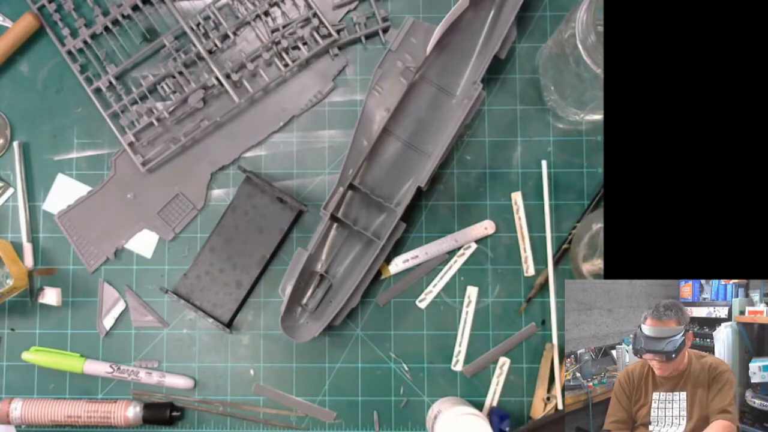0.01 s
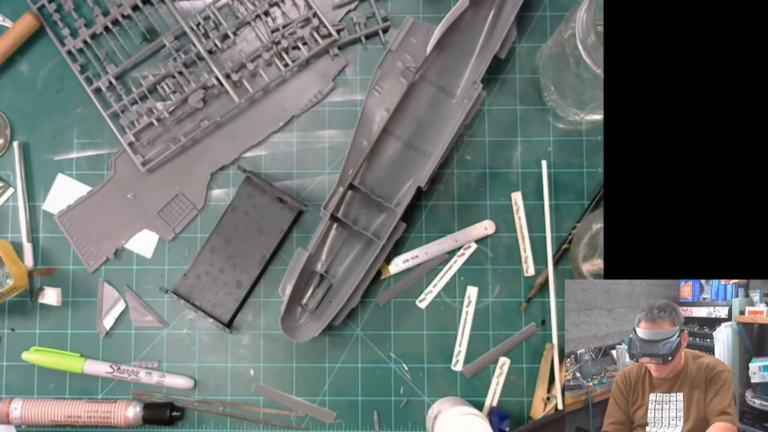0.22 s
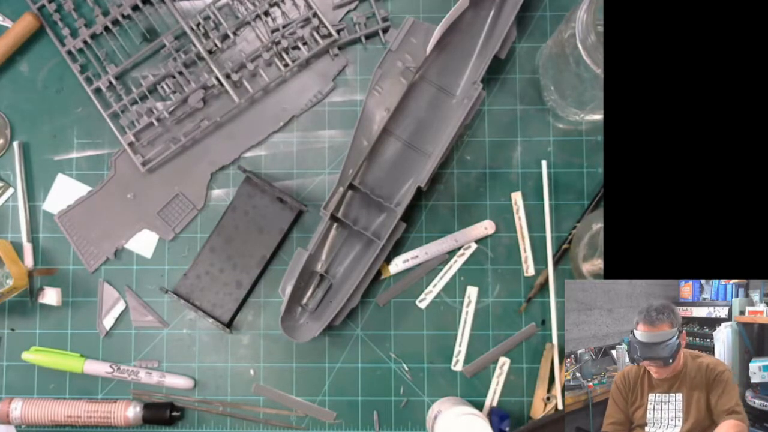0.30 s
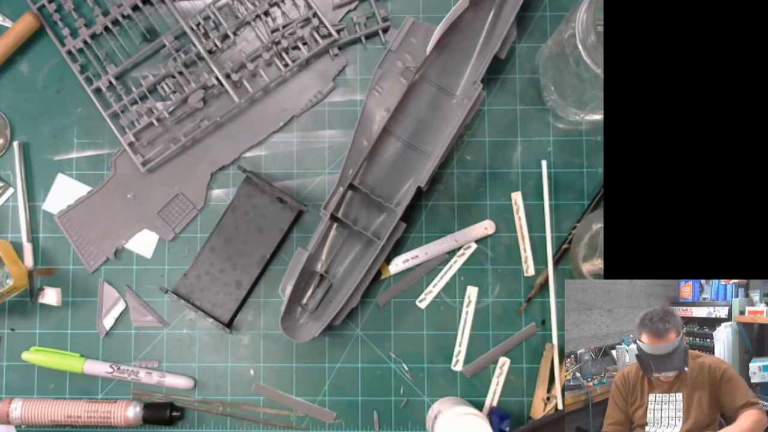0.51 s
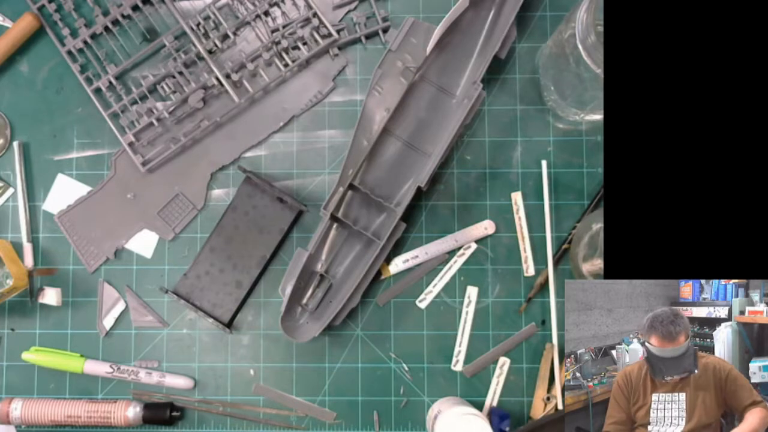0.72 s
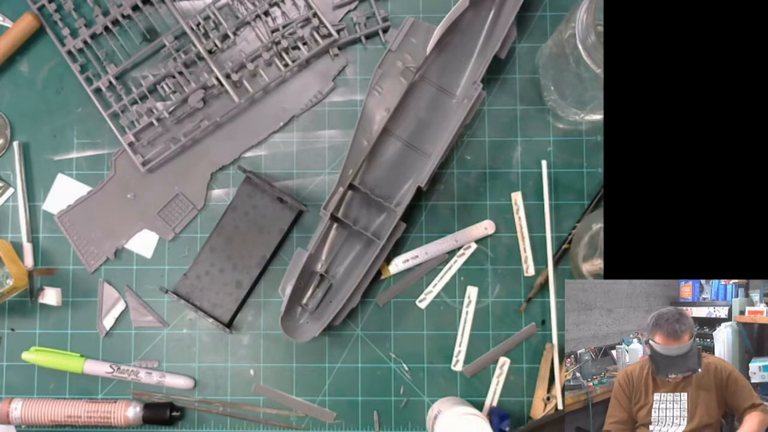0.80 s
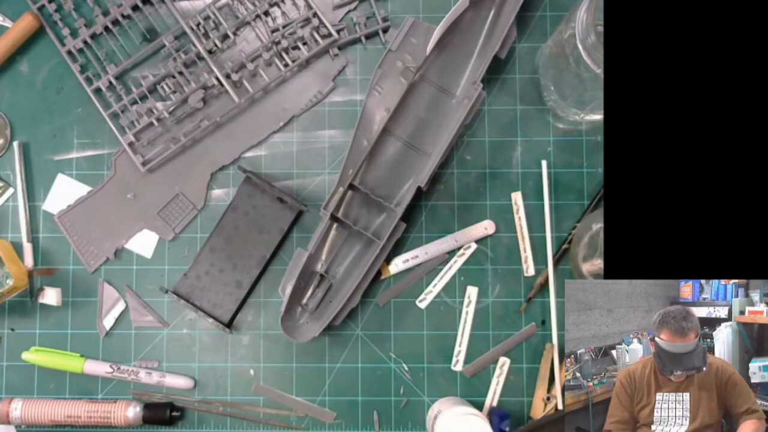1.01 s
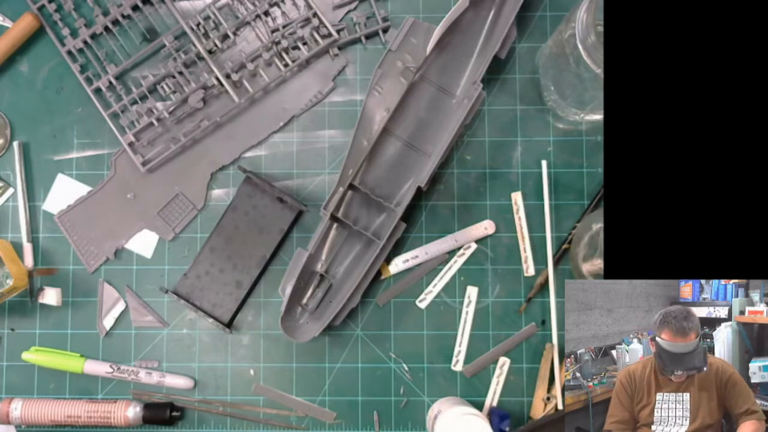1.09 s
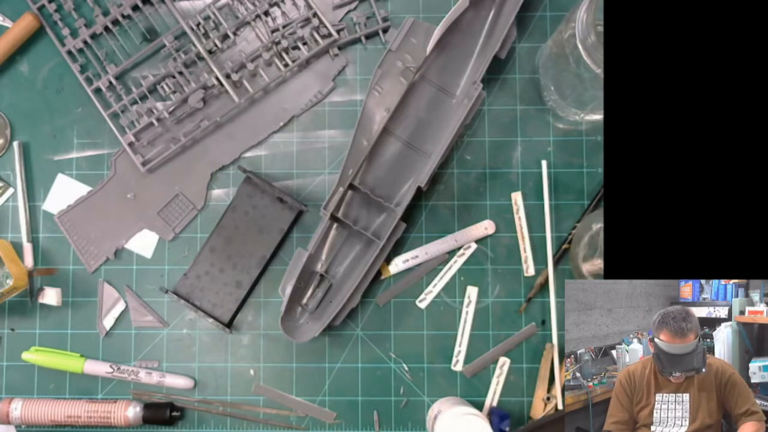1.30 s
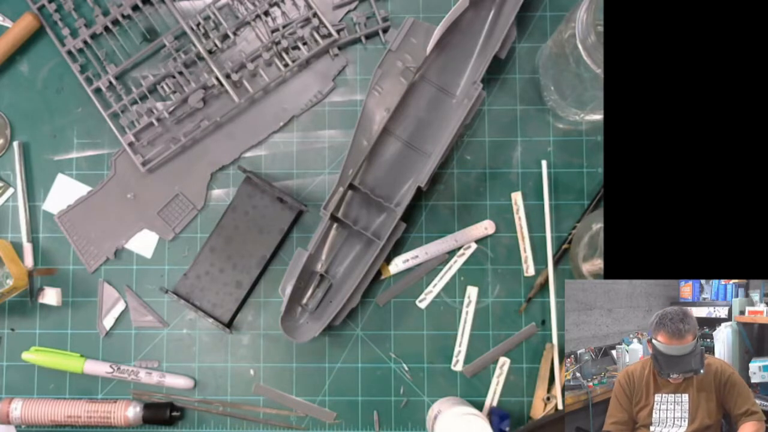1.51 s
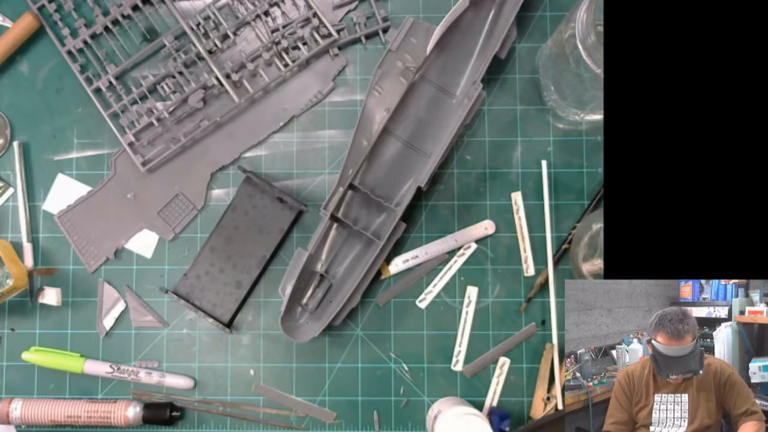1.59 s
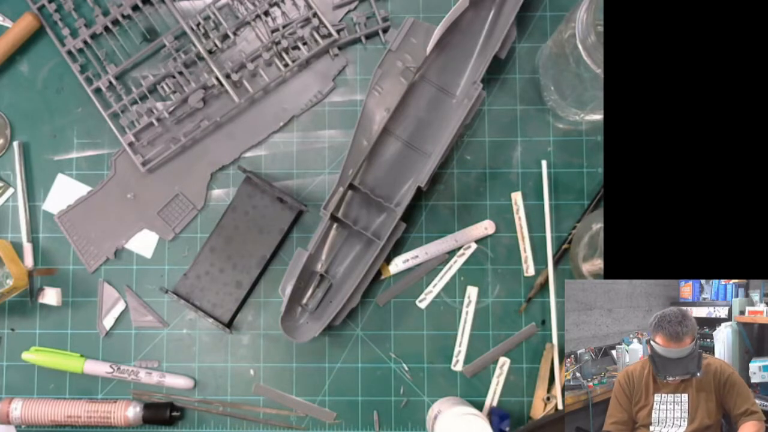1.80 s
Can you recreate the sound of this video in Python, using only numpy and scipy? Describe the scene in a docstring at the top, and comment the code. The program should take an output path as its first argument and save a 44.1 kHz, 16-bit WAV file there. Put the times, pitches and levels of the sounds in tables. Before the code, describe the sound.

One sharp, irregular plastic snip with a brief metallic ring and a rattling bounce comes early; later the tool's joint ticks very quietly. A soft, slightly uneven fan drones throughout, recorded close at a hobby desk.

```python
"""A burst of cracks: steel cutters bite through a plastic sprue, the jaws ring and the part bounces.
Later the cutters' joint ticks faintly as they are handled, close to the microphone at a hobby desk.
Decaying modes make sprue, jaws, joint and spring; noise makes crack, scrape and rustle.
Behind it a fan, slightly unsteady tones over an uneven rush of air, hums in the small room."""
import sys
import numpy as np
from scipy import signal
from scipy.fft import rfft, irfft, next_fast_len
from scipy.io import wavfile
from scipy.ndimage import map_coordinates

SR = 44100
rng = np.random.default_rng(int(sys.argv[2]) if len(sys.argv) > 2 else 0)


def transcribe(u):
    """Save the signal u as a 16-bit wav file named by the first command-line argument.

    u: samples, shape (n,) or (channels, n), limited to [-1, 1]; the rate is SR.
    q: integer samples, one column per channel.
    """
    v = np.clip(np.atleast_2d(u).T, -1, 1)
    q = np.round(v * 32767).astype(np.int16)
    wavfile.write(sys.argv[1], SR, q)


def linear_from_db(decibels):
    """Turn decibels (scalar or array-like) into linear amplitude factors; 0 gives 1."""
    return 10 ** (np.asarray(decibels, float) / 20)


N = 79380  # length in samples, 1.8 s


def along(points, hz):
    """Read (Hz, value) points at hz, interpolating on a log frequency axis."""
    f, v = np.transpose(points)
    return np.interp(np.log(hz + 1), np.log(f + 1), v)


def wobble(rate):
    """A smooth random curve with rate knots a second."""
    knots = rng.standard_normal(N // 8)
    return map_coordinates(knots, [np.arange(N) * rate / SR])


def filtered(x, response):
    """Multiply the spectrum of x by a response of frequency."""
    m = next_fast_len(len(x) + 8192)
    hz = np.fft.rfftfreq(m, 1 / SR)
    return irfft(rfft(x, m) * response(hz), m)[:len(x)]


def ring(modes):
    """Answer of a struck body: decaying sines, alternate modes in opposite sign."""
    t = np.arange(SR // 4) / SR
    total = np.zeros(len(t))
    for k, (hz, db, t60) in enumerate(modes):
        decay = linear_from_db(db - 60 * t / t60)
        total += (-1) ** k * decay * np.sin(2 * np.pi * hz * t)
    return total


def add(track, s, x):
    """Mix x into the track at time s."""
    i = round(s * SR)
    track[i:i + len(x)] += x[:len(track) - i]


def snip():
    """Every contact knocks the sprue, spits a crack and rings the jaws, which choke their ring on shutting."""
    # contacts in the snip: t/s, then sprue knock, crack, lower and upper jaw ring, each level/dB
    contacts = [(0.2033, -18, -47, -54.5, -55.5), (0.205, -9.5, -15.5, -25, -41.5),
                (.2083, -28, -26, -39, -32.5), (0.2107, -13, -14, -24.5, -19),
                (0.2127, -18.5, -17, -27.5, -27), (.2170, -31, -21, -26, -30),
                (0.2215, -22, -34, -42.5, -43.5), (0.2425, -22, -37.5, -39, -48),
                (.2520, -27.5, -39.5, -37, -49.5), (.2637, -14, -25, -32.5, -49),
                (.2670, -31.5, -27.5, -33.5, -42.5), (.2712, -30, -33, -41, -41),
                (.2800, -34, -37, -51, -51), (.2910, -28.5, -45.5, -60, -56), (.2990, -42, -48.5, -51, -55)]
    # modes of the plastic sprue frame: f/Hz, level/dB, t60/s
    plastic = [(1367, -22, 0.032), (1779, -16.5, 0.026), (1930, -18, .022), (2225, -14, 0.024),
               (2345, -15, 0.035), (2485, -16, 0.019), (3250, -20, .012), (3794, -17, .018),
               (4350, -17.5, 0.021), (4695, -13.5, 0.0248), (5200, -14, 0.0082), (5528, -17.5, 0.011)]
    # modes of the steel jaws: f/Hz
    jaw_hz = [6146, 6700, 6910, 7712, 7835, 7903, 8600, 10010, 11038, 11190, 11650, 12665, 13548, 14120]
    # the same jaw modes in the same order: level/dB, t60/s
    jaw_modes = [(-1.5, 0.073), (-16, .04), (-14.5, 0.036), (-11, .2), (-7.5, 0.061), (-3.5, .08),
                 (-15.5, 0.018), (-18.5, .03), (-6, .05), (-9.5, .04), (-13.5, 0.027), (-2, 0.058),
                 (-2.5, 0.069), (-15, .03)]
    # colour of the crack: f/Hz, gain/dB
    crack_colour = [(900, -42.5), (1400, -10.5), (2800, -4.5), (4500, 1.5), (6000, -1.5), (8300, 3),
                    (10000, -9.5), (13000, -4), (15500, -7.5)]
    upper_hz = 9500  # splits the lower jaw ring from the upper
    crack_t60_s = 0.01
    shut_s, shut_db = 0.235, -10  # the jaws meet and choke their ring
    chatter = 0.25  # depth to which the loose blades roughen the ring
    low_cut_hz = 1400  # the small parts radiate little lower

    jaws = [(hz, *mode) for hz, mode in zip(jaw_hz, jaw_modes)]
    lower = ring([mode for mode in jaws if mode[0] < upper_hz])
    upper = ring([mode for mode in jaws if mode[0] >= upper_hz])
    sprue = ring(plastic)
    knock, spit = np.zeros(N), np.zeros(N)
    open_steel, shut_steel = np.zeros(N), np.zeros(N)
    t = np.arange(SR // 50) / SR
    for s, knock_db, crack_db, lower_db, upper_db in contacts:
        add(knock, s, linear_from_db(knock_db) * sprue)
        steel = shut_steel if s > shut_s else open_steel
        add(steel, s, linear_from_db(lower_db) * lower + linear_from_db(upper_db) * upper)
        add(spit, s, linear_from_db(crack_db - 60 * t / crack_t60_s) * rng.standard_normal(len(t)))

    choke_db = np.interp(np.arange(N) / SR, [shut_s - .002, shut_s + .001], [0, shut_db])
    # only contacts before the jaws shut are choked
    steel = linear_from_db(choke_db) * open_steel + shut_steel
    steel *= 1 + chatter * wobble(1500)
    crack = filtered(spit, lambda hz: linear_from_db(along(crack_colour, hz)))
    high_pass = signal.butter(6, low_cut_hz, "high", fs=SR, output="sos")
    return signal.sosfilt(high_pass, knock + steel + crack)


def ticks():
    """A short dying scrape excites the joint and the return spring; the hand rustles on the grip."""
    # ticks of the joint: t/s, then joint, spring and rustle, each level/dB, and scrape t60/s
    tick_list = [(1.328, -79, -57.5, -39.5, .2), (1.356, -72, -44, -49, 0.011),
                 (1.365, -72, -71, -33, 0.21), (1.4222, -65, -52, -36, .02),
                 (1.4297, -63.5, -52.5, -31, 0.044), (1.5972, -42.5, -70, -33, 0.023),
                 (1.607, -44, -75, -27, 0.14)]
    # modes of the loose joint: f/Hz, level/dB, t60/s
    joint_modes = [(5110, -6, 0.0091), (5790, -0.5, 0.019), (6030, -3, 0.016), (6740, -5.5, 0.013),
                   (8350, -1.5, 0.0062), (10090, 2.5, 0.011), (11360, -7, 0.0075), (12460, -4, .012),
                   (13200, -18, .01), (14000, -10, 0.0094), (15200, -20, 0.014), (15400, -8, 0.0085)]
    # modes of the return spring: f/Hz, level/dB, t60/s
    spring_modes = [(4510, -15.5, 0.023), (5530, -20, 0.023), (9910, -3, 0.046), (12800, -27, 0.022),
                    (14700, -15, 0.018)]
    # colour of the hand on the grip: f/Hz, gain/dB
    rustle_colour = [(100, -28), (160, 4), (600, 8.5), (1200, 7), (2500, 1.5), (4500, 0.5), (7000, -7),
                     (11000, -38), (15000, -27)]
    rise_s = 0.002  # time constant of the scrape's onset

    joint, spring = ring(joint_modes), ring(spring_modes)
    metal, hand = np.zeros(N), np.zeros(N)
    t = np.arange(SR // 6) / SR
    for s, joint_db, spring_db, rustle_db, t60 in tick_list:
        # two noises of one shape: one for the metal, one for the hand
        scrape = linear_from_db(-60 * t / t60) * rng.standard_normal((2, len(t)))
        scrape *= 1 - np.exp(-t / rise_s)
        scrape /= np.linalg.norm(scrape[0])
        body = linear_from_db(joint_db) * joint + linear_from_db(spring_db) * spring
        add(metal, s, signal.fftconvolve(scrape[0], body))
        add(hand, s, linear_from_db(rustle_db) * scrape[1])
    return metal + filtered(hand, lambda hz: linear_from_db(along(rustle_colour, hz)))


def room(x):
    """Diffuse answer of the room: delayed noise of unit energy, each frequency dying at its own speed."""
    # decay of the room: f/Hz, t60/s
    room_decay = [(1000, 0.19), (2500, 0.25), (5000, 0.19), (9000, .17), (15000, 0.14)]
    delay_s = 0.004
    hz, t, spectra = signal.stft(rng.standard_normal(SR // 3), SR, nperseg=256)
    decay = linear_from_db(-60 * t / along(room_decay, hz)[:, None])
    tail = signal.istft(spectra * decay, SR, nperseg=256)[1]
    tail = tail / np.linalg.norm(tail)
    delayed = np.pad(x, (round(delay_s * SR), 0))
    return signal.fftconvolve(delayed, tail)[:N]


def fan():
    """Slightly unsteady motor tones over the rush of air, whose low part is uneven in level."""
    # motor tones: f/Hz, level/dB rms about which each wavers
    hum = [(59, -74), (90, -60.5), (120, -71.5), (142, -76.5), (258, -67.5), (516, -80)]
    # rush of air before its low part is made uneven: f/Hz, level/dB per Hz
    air_colour = [(20, -96), (50, -94), (150, -92.5), (220, -92.5), (290, -92), (330, -83.5), (380, -90),
                  (425, -99), (490, -92), (800, -92), (1000, -96.5), (2000, -103), (4000, -112),
                  (6300, -120), (10000, -130), (15700, -134)]
    # chance rises and dips of the low rush: t/s, level/dB (only the departure from the mean counts)
    unevenness = [(0.05, -64), (0.802, -67.5), (0.962, -64.5), (0.972, -61.5), (1.152, -67), (1.176, -60),
                  (1.238, -67), (1.696, -62), (1.75, -68.5)]
    waver_db, waver_rad = 1.12, 0.2  # unsteadiness of level and phase

    t = np.arange(N) / SR
    tones = np.zeros(N)
    for hz, db in hum:
        level = np.sqrt(2) * linear_from_db(db + waver_db * wobble(6))
        phase = 2 * np.pi * (hz * t + rng.random()) + waver_rad * wobble(9)
        tones += level * np.sin(phase)

    # sqrt(SR / 2) brings white noise to 0 dB per Hz
    air = filtered(rng.standard_normal(N), lambda hz: linear_from_db(along(air_colour, hz)) * np.sqrt(SR / 2))
    # a broad band about 400 Hz
    low_air = filtered(air, lambda hz: np.exp(-(np.log((hz + 1) / 400) / 0.79) ** 4))
    s, db = np.transpose(unevenness)
    uneven_gain = linear_from_db(np.interp(t, s, db - db.mean()))
    return tones + air + low_air * (uneven_gain - 1)


def scene():
    """Cutters near the microphone, the room around them and the fan, alike on both channels."""
    cut, tick = snip(), ticks()
    cut_room_db, tick_room_db = -10, -9
    reverb = linear_from_db(cut_room_db) * room(cut) + linear_from_db(tick_room_db) * room(tick)
    mono = cut + tick + reverb + fan()
    return np.array([mono, mono])


def top_cut(x):
    """Nothing passes above the cut-off."""
    return signal.sosfilt(signal.butter(12, 16370, fs=SR, output="sos"), x)


def record(dry):
    """One microphone on both channels, with nothing passed from top_hz up."""
    top_hz = 15750
    mix = np.array([filtered(channel, lambda hz: hz < top_hz) for channel in dry])
    return top_cut(mix)


dry = scene()
out = record(dry)
transcribe(out)
```